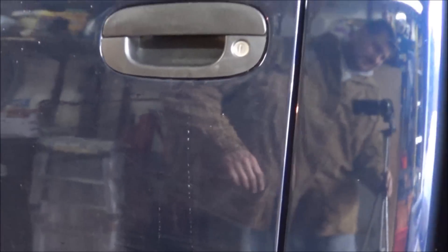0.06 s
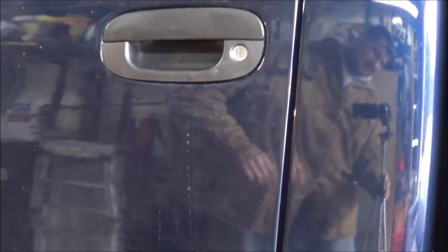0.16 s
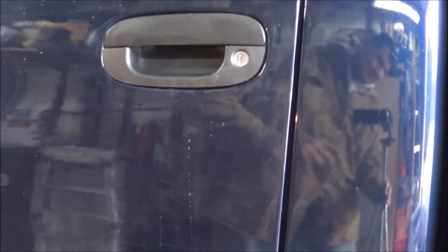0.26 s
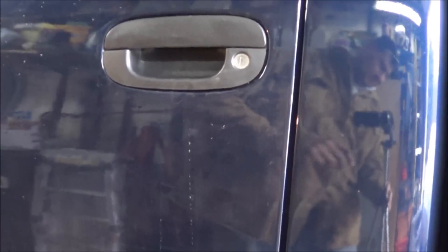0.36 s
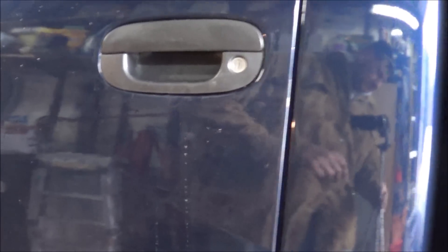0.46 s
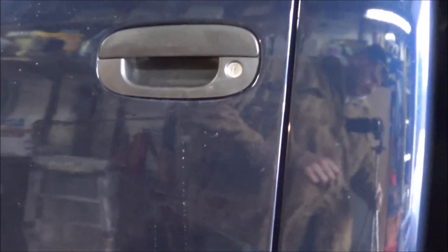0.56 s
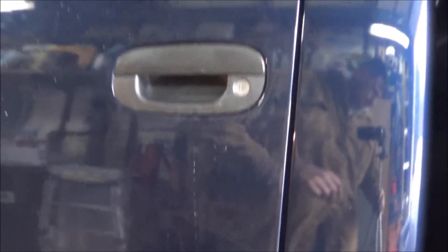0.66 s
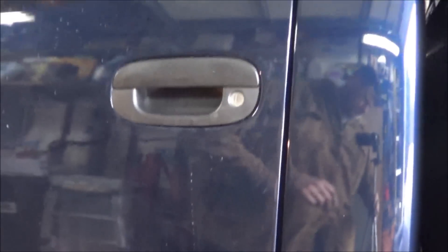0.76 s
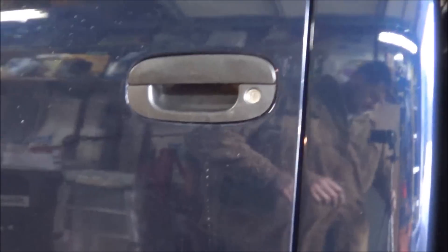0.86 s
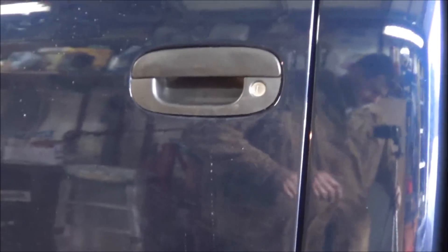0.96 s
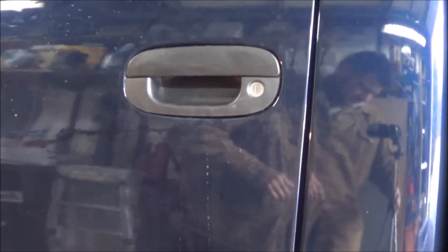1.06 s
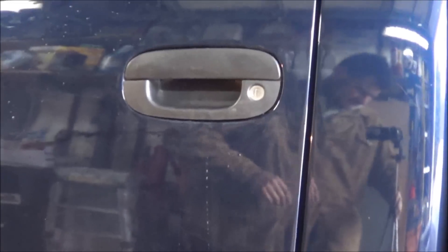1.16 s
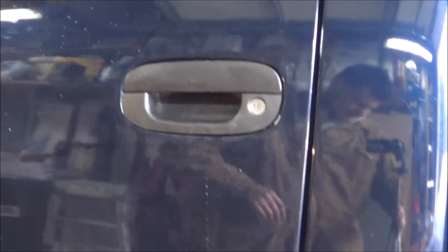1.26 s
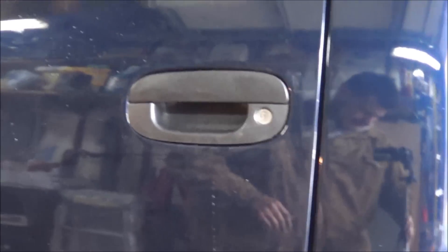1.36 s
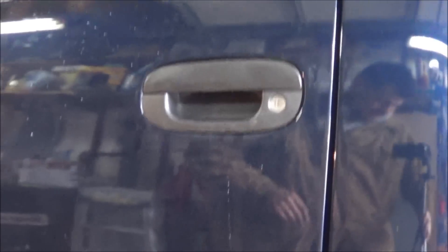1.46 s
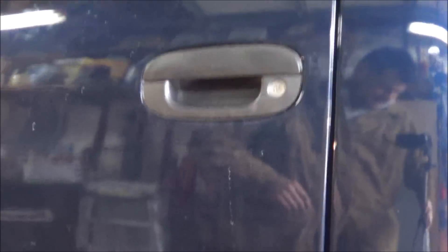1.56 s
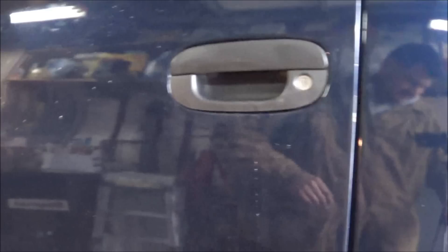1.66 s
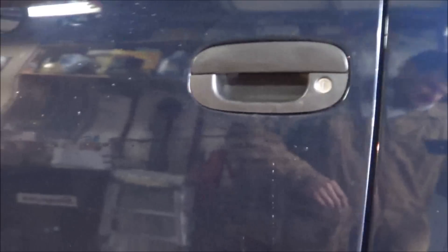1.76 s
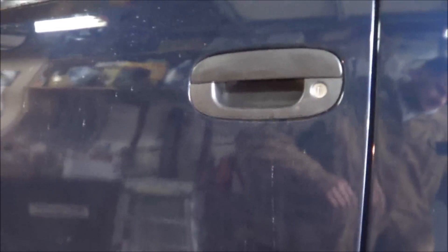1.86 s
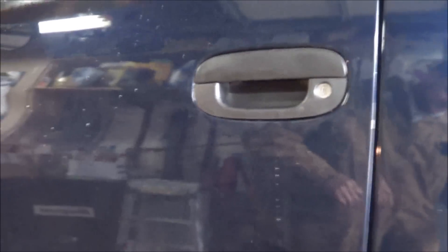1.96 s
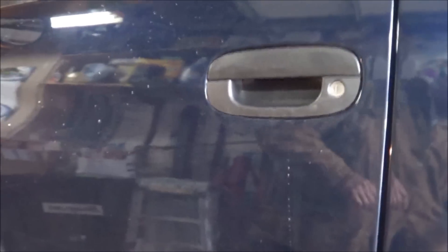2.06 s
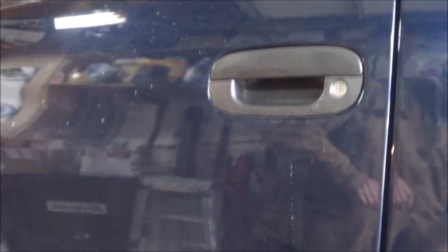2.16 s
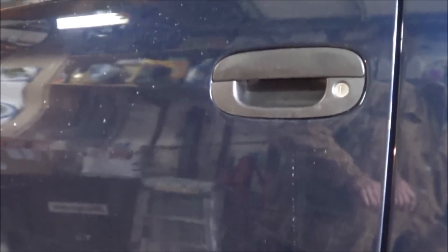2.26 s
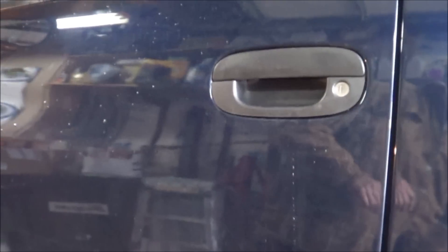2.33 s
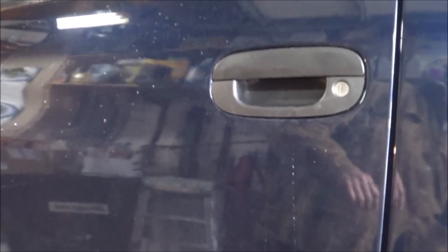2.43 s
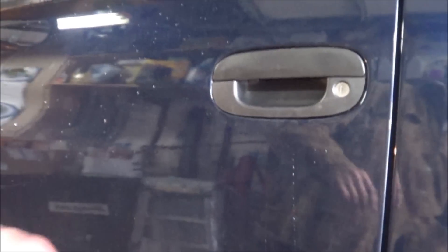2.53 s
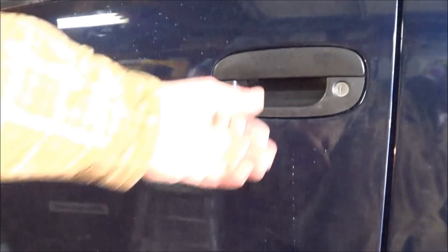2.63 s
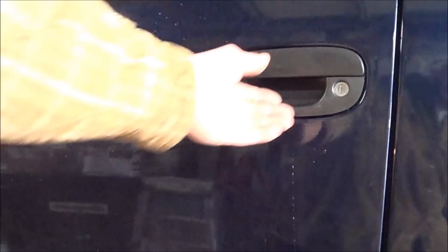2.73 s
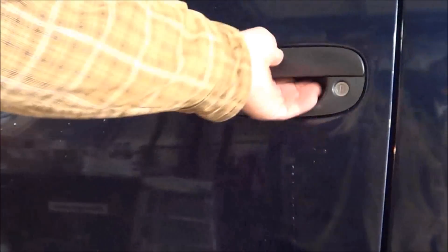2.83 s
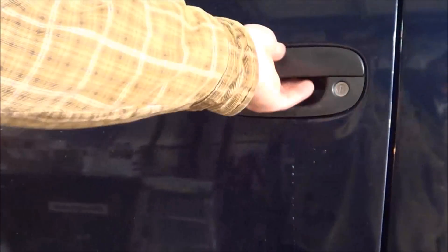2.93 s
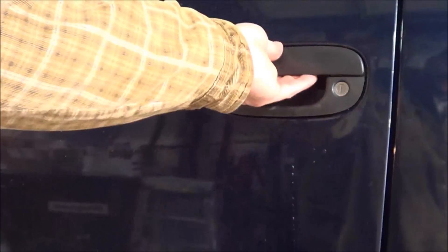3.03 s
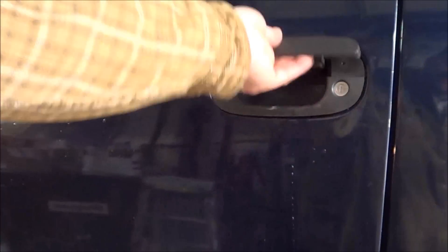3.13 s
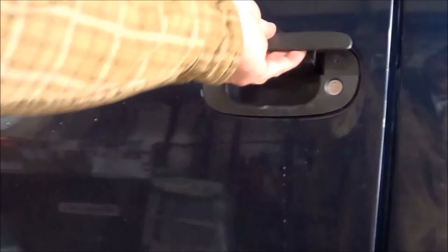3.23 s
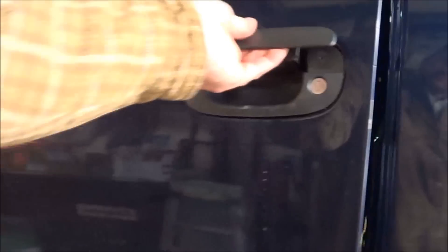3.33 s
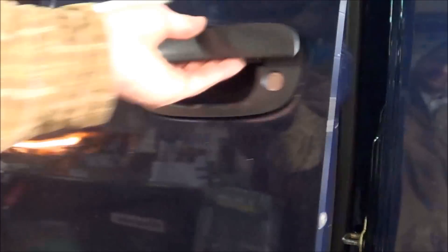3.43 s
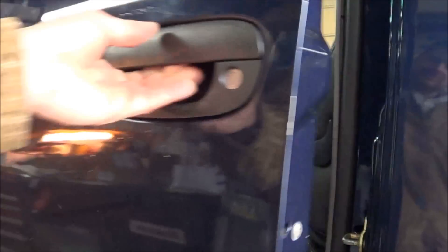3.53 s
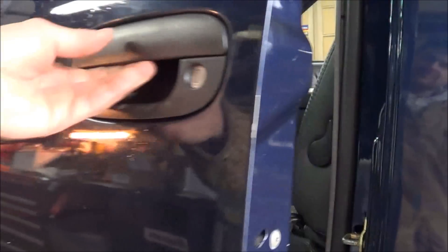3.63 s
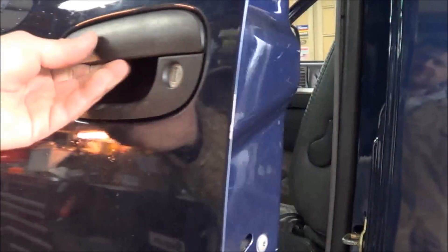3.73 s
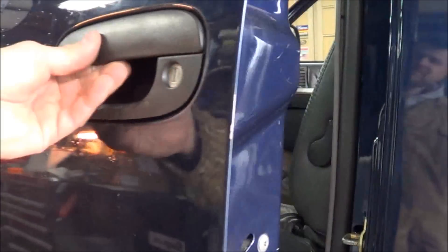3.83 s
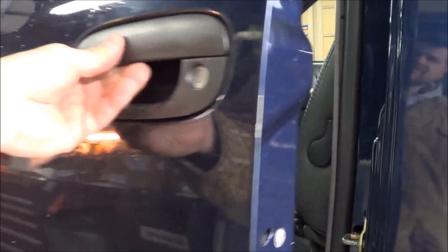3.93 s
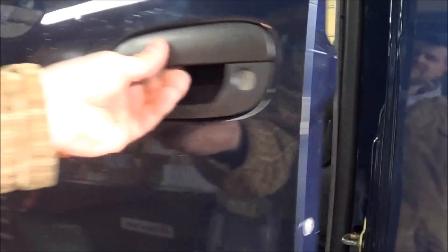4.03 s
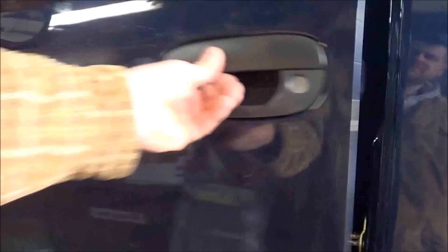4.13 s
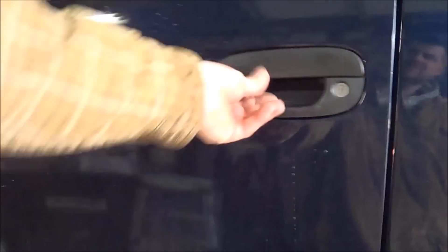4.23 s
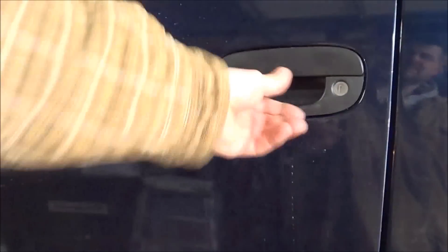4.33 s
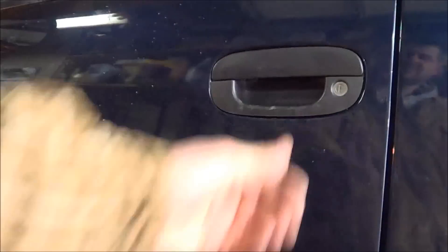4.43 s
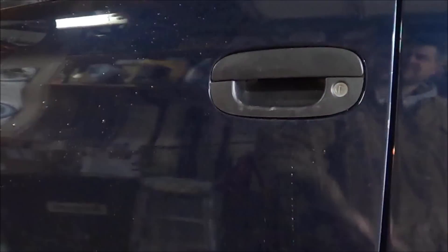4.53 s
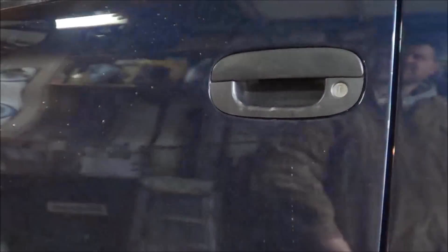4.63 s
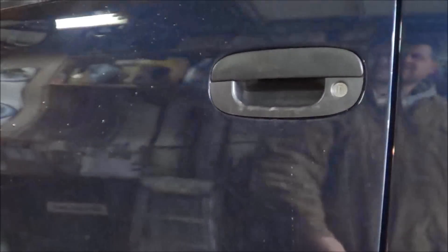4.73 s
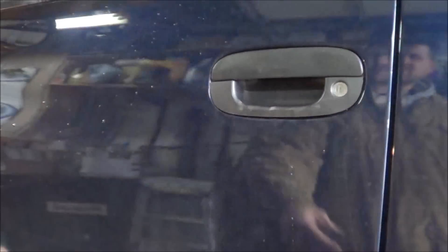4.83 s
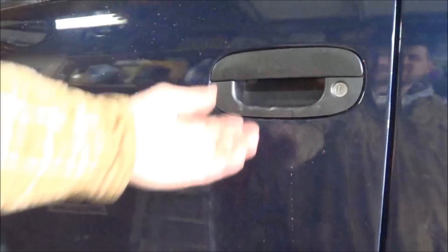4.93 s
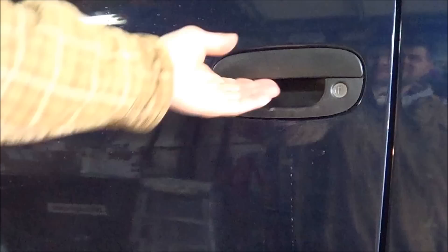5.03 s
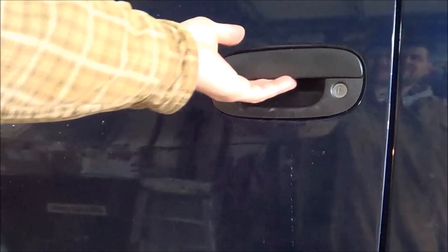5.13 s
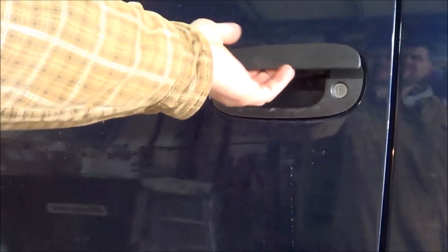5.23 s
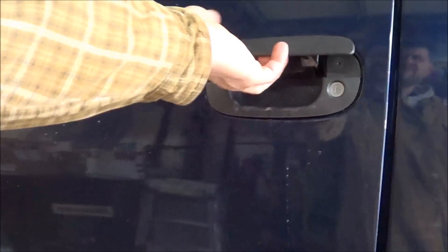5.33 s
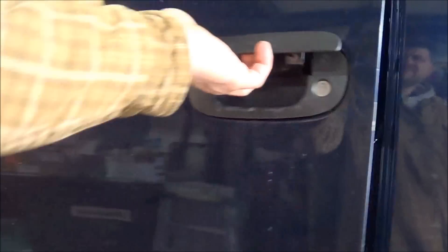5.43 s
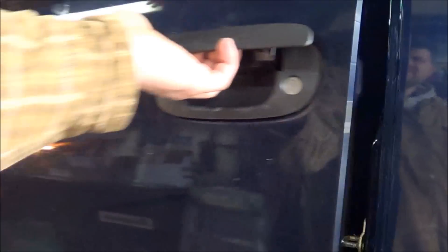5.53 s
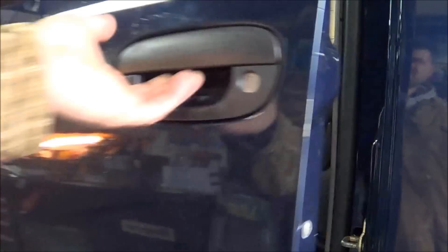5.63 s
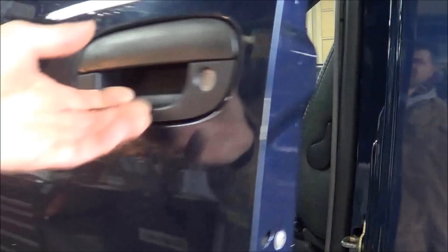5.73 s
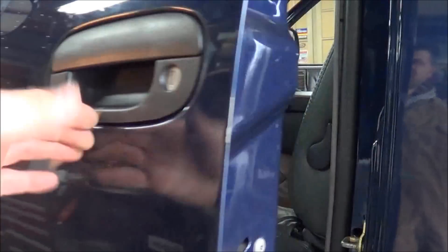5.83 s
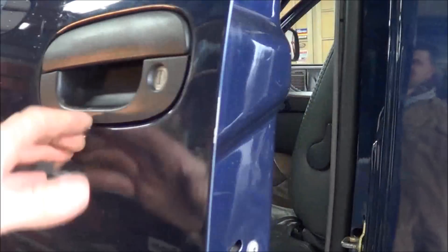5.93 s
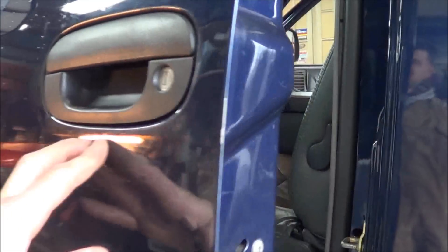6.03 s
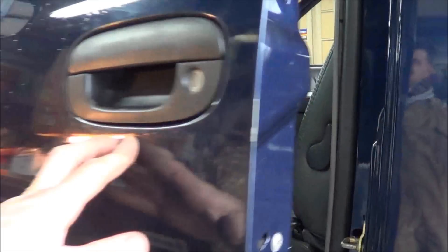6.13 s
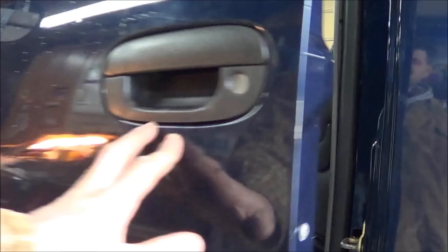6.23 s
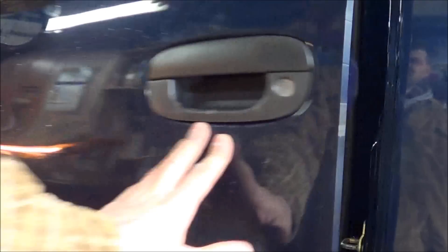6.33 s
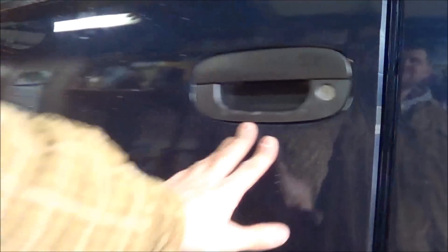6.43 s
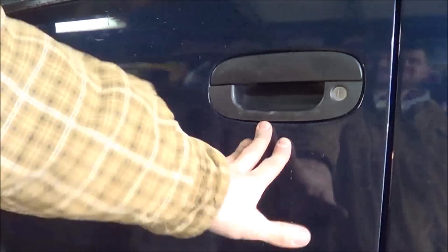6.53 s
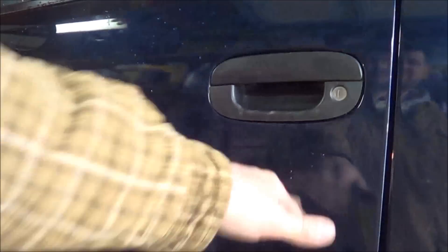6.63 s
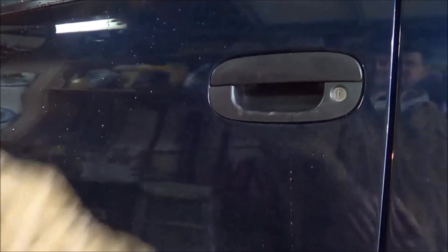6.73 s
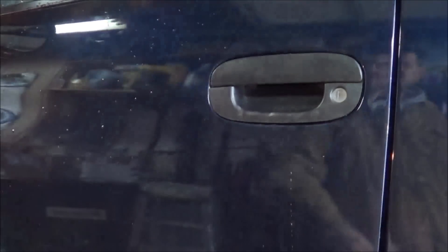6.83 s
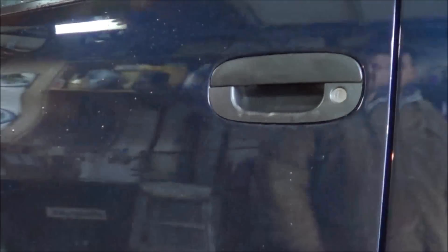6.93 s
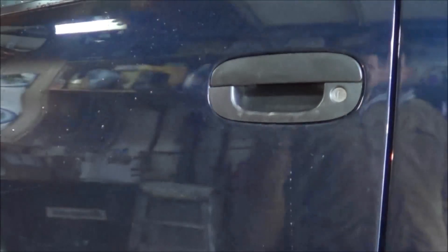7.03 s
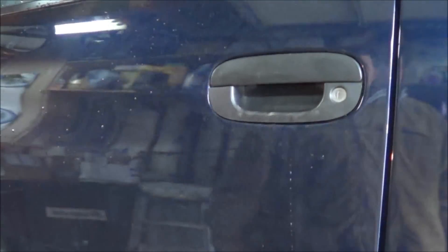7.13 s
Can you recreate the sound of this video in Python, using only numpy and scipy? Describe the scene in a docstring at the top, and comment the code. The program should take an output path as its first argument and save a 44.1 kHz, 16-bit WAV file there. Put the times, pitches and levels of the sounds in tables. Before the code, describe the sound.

Soft shuffling and small ticks over faint shop hiss and a very thin high whine. A light loose object lands and rattles to rest. Then a hollow steel vehicle door is unlatched with a sharp pop, its handle clacks back, and it is pushed shut with a deep thump and metallic clinks; all this happens twice. Outside, a vehicle approaches with growing engine hum and tyre noise. Close-up, short room echo.

```python
"""Pickup door in a garage

A door is opened and pushed shut twice: struck modes and decaying noise form its pops, booms, snaps and clinks.
Before that a light thing bounces on the floor, with irregular contacts and a dispersive springy buzz.
Filtered noise makes the sleeve and shop air; Doppler-shifted exhaust lines and noise make a vehicle droning
closer outside. A thin steady whine remains, and close-set microphones add phase differences between the sides.
"""
import sys
import numpy as np
from scipy import signal
from scipy.fft import rfft, irfft, next_fast_len
from scipy.io import wavfile

SR = 44100
rng = np.random.default_rng(int(sys.argv[2]) if len(sys.argv) > 2 else 0)


def log_audio(samples):
    """Write samples as a 16-bit WAV file to the path given in sys.argv[1]."""
    # one column per channel
    frames = np.atleast_2d(samples).T
    # limit to full scale, then quantise
    limited = np.clip(frames, -1, 1)
    pcm = np.round(limited * 32767).astype(np.int16)
    wavfile.write(sys.argv[1], SR, pcm)


N = 316638

# Every event tilt is relative to the colour or modes of its body; every spectrum level is relative.
# Door unlatching and popping off its seal: (time [s], reference level [dB])
OPENINGS = [(3.1895, -14), (5.371, -13.5)]
# Contacts set off by each opening: (delay [s], relative level [dB], treble tilt [dB/octave])
OPENING_POP = [(0, 1.5, -1.5), (.012, -1.5, 0.18)]
OPENING_SNAP = [(0.00048, -8.5, -2)]
OPENING_CLICK = [(.0048, -8.5, -1)]
# Door pushed shut: (time [s], reference level [dB])
SLAMS = [(4.3107, -13.5), (6.554, -14.5)]
# Latch riding over the striker and dropping home: (delay [s], relative level [dB], treble tilt [dB/octave])
SLAM_LATCH = [(0, -11, -4), (.016, -10, 2), (0.0233, -6, 4.5), (.039, -4, -2.5), (.058, -6, -3.5)]
# Seal, then latch, shaking the cab: (delay [s], relative level [dB], treble tilt [dB/octave])
SLAM_CAB = [(.003, -12.5, -2.5), (0.044, -0.5, 0)]
# Sprung handle let go: (time [s], level [dB], loss per bounce [dB], panel answer level [dB],
# panel answer tilt [dB/octave])
RELEASES = [(3.5502, -16, 9, -23, -1.5), (5.702, -15, 2, -17, 2.5)]
# Single snaps of handle or latch: (time [s], level [dB], treble tilt [dB/octave])
SNAPS = [(3.119, -27, -0.5), (4.251, -28.5, 1.5), (4.403, -20.5, 1.5)]
# Dry clicks of rod linkage and pawl: (time [s], level [dB], treble tilt [dB/octave])
LINKAGE_CLICKS = [(3.153, -21.5, -2.5), (3.5145, -33.5, -2), (5.286, -29.5, -2), (5.669, -29, -4.5),
                  (6.672, -33.5, 7)]
# Light knocks on the hollow door: (time [s], level [dB], treble tilt [dB/octave])
KNOCKS = [(2.803, -37, 9), (2.820, -33, -8), (3.122, -38, -12), (4.253, -25.5, 4.5), (4.282, -25, 2.5),
          (5.290, -27.5, -3.5), (6.520, -28.5, 3.5)]
# Freed door rebounding on its catch: (time [s], level [dB], treble tilt [dB/octave])
REBOUNDS = [(3.215, -24, -8), (3.264, -24.5, 0.5), (5.4391, -20.5, 1.5)]
# Steel latch clinking: (time [s], level [dB], treble tilt [dB/octave])
CLINKS = [(4.3495, -18.5, 3.5), (4.461, -29.5, -0.5), (4.502, -18.5, 1.5), (4.677, -26, 0),
          (4.745, -33.5, -3.5), (6.953, -19.5, -.5), (7.074, -25.5, -2), (7.132, -31.5, -1.5)]
# Light thing landing: (time [s], level [dB], treble tilt [dB/octave], delay of the other end's slap [s],
# slap level [dB])
BOUNCES = [(1.609, -17.5, -0.5, 0.0079, -17), (1.778, -16, -2, .013, -25.5), (1.913, -20, -2, 0.0092, -16),
           (1.997, -30, -2, .024, -29), (2.060, -26.5, -5, .006, -21), (2.114, -30, 1.5, .007, -47),
           (2.150, -26, -2.5, 0.0088, -46), (2.222, -28.5, -3, 0.019, -33.5),
           (2.2732, -24.5, -1, 0.007, -26), (2.372, -31, 0.5, 0.0057, -42)]
# Small dry ticks: (time [s], level [dB], treble tilt [dB/octave])
TICKS = [(.768, -38, 6), (.941, -30, 9.5), (1.017, -40, -5.5), (1.682, -31, -4), (1.706, -36, 7),
         (1.944, -22.5, -1.5), (2.0095, -31, 11), (2.137, -35, 6), (2.275, -26.5, 2), (2.372, -38, 2),
         (2.567, -35.5, 8), (2.831, -33, -4)]
# Soft shuffling bumps: (time [s], level [dB])
BUMPS = [(.068, -38.5), (.160, -35), (0.629, -42.5), (.785, -38), (0.844, -40.5), (1.035, -41.5),
         (1.110, -38.5)]
# Strokes of sleeve and hand: (time [s], length before release [s], level [dB])
STROKES = [(0.14, 0.34, -51.5), (0.52, 0.046, -44), (0.775, 0.076, -44), (.9, 0.16, -53),
           (2.823, 0.13, -43), (3.52, 0.091, -38.5), (3.796, 0.045, -50.5), (4.17, 0.083, -55),
           (5.093, 0.089, -44)]

# Vibration modes of each struck body: (frequency [Hz], relative level [dB], t60 [s])
HANDLE_MODES = [(1220, 9, 0.14), (1522, 1, 0.11), (1930, -3, 0.13), (2676, -3, 0.12), (2810, -37, 0.043),
                (3750, -26, 0.13)]
POP_MODES = [(103, -8.5, 0.11), (174.6, 0.5, 0.14), (217, -21, 0.21), (278, -10, 0.098), (370, -15, 0.07),
             (432, -14.5, .13), (576, -14, 0.065), (723, -12.5, 0.15)]
DOOR_MODES = [(169, 2, 0.33), (182, -13, 0.2), (230, -2, 0.21), (291, -4, 0.1), (309.4, -10.5, 0.11),
              (426.7, -9, 0.11), (462, -9, 0.077), (546, -1.5, 0.096), (674, -14.5, 0.074), (787, -11, 0.2),
              (1047, -18, 0.042)]
CATCH_MODES = [(570, -7, 0.071), (635, 8, 0.053), (719, 3, 0.075), (775, -15, 0.048), (1023, -19, 0.22)]
LATCH_MODES = [(550, -4, .08), (626, 0, 0.12), (728, -8, 0.06), (811, -1.5, 0.083), (2350, 6, 0.029),
               (2400, -6.5, .035), (2467, -4, 0.062), (2550, -8, 0.048), (3445, -12.5, 0.086)]
CAB_MODES = [(23.4, 1, 0.58), (37.8, 3, 0.54), (46.3, -11, 0.47), (82.5, -20, 0.73), (95, 13.5, 0.24),
             (155.3, 16, 0.16)]
BOUNCE_MODES = [(184, -4, 0.061), (511, -7, 0.14), (717, -4.5, 0.072), (1068, 1, 0.083), (1133, -7.5, 0.16),
                (2350, -2.5, 0.033), (3240, -4, 0.026)]
# Noise spectrum of each contact and its dense ringing: (frequency [Hz], density [dB per Hz])
HANDLE_COLOUR = [(150, 13), (500, 6.5), (1200, 1.5), (2600, -1), (3800, -4.5), (5000, -8), (9500, -4.5),
                 (12000, -7.5), (15500, -39)]
CLICK_COLOUR = [(200, -1), (900, -4.5), (1900, 1), (3700, 3.5), (6500, -2.5), (10000, -1), (15000, 3)]
DOOR_COLOUR = [(30, -49), (70, -24), (130, -7.5), (220, 2.5), (330, -4.5), (520, 2.5), (750, -10),
               (1100, -12), (2000, -24.5), (5000, -35), (15000, -42)]
CATCH_COLOUR = [(150, -19), (400, -18), (700, 3.5), (1100, -9), (2500, -24), (9000, -34.5), (15000, -31)]
LATCH_COLOUR = [(150, -1), (260, -7.5), (700, -8), (1400, -11.5), (2500, -11.5), (4500, -17.5),
                (10000, -18), (15000, -15.5)]
BOUNCE_COLOUR = [(50, -6), (150, 1.5), (600, -0.5), (1100, -2), (1600, -11), (2400, -8.5), (4800, -18),
                 (9000, -12.5), (15000, -21)]
TICK_COLOUR = [(60, -40), (400, -55), (2000, -2), (5000, -4.5), (9500, 9), (15500, -0.5)]
BUMP_COLOUR = [(50, -19.5), (150, -1), (320, -10), (600, 3.5), (1100, -3.5), (2200, -23.5), (6000, -25),
               (15000, -26)]
# Multiplier of crack and ringing times: (frequency [Hz], factor [-])
RING_T60_FACTOR = [(100, 1.04), (500, 1.54), (2000, 1.53), (8000, 1.1), (16000, 0.22)]

# Exhaust lines: (multiple of the cycle rate [-], relative level [dB])
BOOM = [(4, -2.5), (5, -11.5)]
OVERTONES = [(7, -0.5), (8, -2), (12, -10.5)]
# Course of boom and overtones before their overall gains: (time [s], relative level [dB])
BOOM_LEVEL = [(0.0, -61), (1.18, -61.5), (2.18, -48), (2.72, -59), (3.22, -46), (3.58, -51), (4.52, -39),
              (4.98, -45.5), (5.84, -27.5), (5.96, -26.5), (6.34, -22), (6.74, -33), (7.18, -35.5)]
OVERTONE_LEVEL = [(4.7, -58), (4.98, -47.5), (5.29, -35), (6.31, -38), (6.47, -32), (7.18, -37)]
# Spectra of cloth, tyres, road hiss and steady shop air: (frequency [Hz], density [dB per Hz])
CLOTH = [(200, -15), (900, 7.5), (2500, -5.5), (5000, -2), (7500, -4), (9700, 4), (11500, -2), (13000, -8),
         (15500, -20)]
TYRES = [(40, -5), (100, -8), (250, 1), (420, -23), (700, 0), (950, 1), (1400, -4), (2200, -6), (4000, -22),
         (9000, -30), (12000, -32), (15500, -50)]
ROAD_HISS = [(200, -23), (900, -1), (2500, 4), (7000, 1), (9700, 0.5), (13000, -14), (15500, -25)]
AIR = [(15, -46), (25, -10.5), (58, -15.5), (72, -14), (92, 2.5), (130, -23.5), (166, -16.5), (249, -9),
       (285, -60), (354, -16.5), (1070, -11.5), (5570, -31), (10400, -35.5), (14400, -31), (16000, -51)]
# Decay of the garage: (frequency [Hz], t60 [s])
GARAGE_T60 = [(100, 0.64), (1000, 0.17), (4000, 0.23), (10000, 0.26), (16000, 0.19)]
# Phase lead of the left side at obliqueness 1: (frequency [Hz], lead [rad])
PORT_PHASE = [(30, 0.41), (110, 0.43), (300, 0.86), (600, 0.79), (1200, 0.84), (2400, 0.35), (4800, 0.53),
              (10000, 0.027)]
# Diffuse sound before the port phase: (frequency [Hz], side minus mid [dB])
WIDTH = [(40, -55), (200, -14.5), (700, -9), (2000, -6.5), (5000, -5), (9000, -11), (15000, -59)]

# Door
RELEASE_GAP_S, RELEASE_TILT_DB, PANEL_ANSWER_S = .014, 1.5, .019  # tilt in dB per octave
SHUDDER_GAP_S, SHUDDER_LOSS_DB, SHUDDER_TILT_DB = .0195, 2, 2.5  # loss per contact, tilt per octave
# Dropped thing: the slap is brighter, then it rocks back more weakly
SLAP_TILT_DB, ROCK_S, ROCK_LOSS_DB = 3.5, .019, 9.5  # extra tilt in dB per octave
RATTLES_PER_S, RATTLE_DB, RATTLE_FADE_DB_PER_S = 30, -38, 6  # level at the first landing
BUZZ_DELAY_S, BUZZ_DB = .014, -35
BUMP_TILT_DB = 2  # per octave
# Cloth
STROKE_ATTACK_S, STROKE_RELEASE_S = .009, .046  # the release is an amplitude time constant
HANDLING_DB = -55
# Vehicle at steady speed; the distance is at its nearest
PASS_S, SPEED_M_PER_S, DISTANCE_M, CYCLES_PER_S = 6.9, 10.5, 7.4, 21.8
BOOM_DB, OVERTONES_DB = 1.5, -4
TYRES_DB, HISS_DB, FAR_TRAFFIC_DB = -33, -43, -50.5  # tyres and hiss at the nearest point
# Background
AIR_DB = -43
WHINE_HZ, WHINE_DB = 15734, -67
CUTOFF_HZ = 16100

# Noise bands and time axes
EDGES = np.geomspace(22, 17500, 24)
CENTRES = np.sqrt(EDGES[1:] * EDGES[:-1])
BANK = [signal.butter(2, pair, "band", fs=SR, output="sos") for pair in zip(EDGES, EDGES[1:])]
TIME = np.arange(N) / SR
RING_TIME = TIME[:SR // 2]


def door():
    """Impact excitation: handle, linkage and latch strike a hollow steel door, which booms and shakes the cab."""
    snaps = SNAPS + set_off(OPENINGS, OPENING_SNAP) + set_off(SLAMS, SLAM_LATCH)
    clicks = LINKAGE_CLICKS + set_off(OPENINGS, OPENING_CLICK)
    knocks, rebounds = list(KNOCKS), []
    for s, level_db, loss_db, panel_db, panel_tilt_db in RELEASES:
        knocks.append((s + PANEL_ANSWER_S, panel_db, panel_tilt_db))
        snaps += chatter(s, level_db, RELEASE_TILT_DB, RELEASE_GAP_S, loss_db, count=3)
    for s, level_db in SLAMS:
        knocks += chatter(s, level_db, SHUDDER_TILT_DB, SHUDDER_GAP_S, SHUDDER_LOSS_DB, count=6)
    for s, level_db, tilt_db in REBOUNDS:
        rebounds += chatter(s, level_db, tilt_db, gap_s=.018, loss_db=3.5, count=2)

    handle = blows(snaps, HANDLE_COLOUR, HANDLE_MODES, modes_db=-10.5, crack_t60=.015,
                   ring_t60=.13, ring_db=4.5, rise_s=.00013, ring_growth=.17)
    linkage = blows(clicks, CLICK_COLOUR, None, modes_db=0, crack_t60=.016,
                    ring_t60=.11, ring_db=-24, rise_s=.002, ring_growth=0)
    pop = blows(set_off(OPENINGS, OPENING_POP), DOOR_COLOUR, POP_MODES, modes_db=3, crack_t60=.049,
                ring_t60=.18, ring_db=4, rise_s=.00052, ring_growth=0)
    panel = blows(knocks, DOOR_COLOUR, DOOR_MODES, modes_db=-1.5, crack_t60=.11,
                  ring_t60=.1, ring_db=1, rise_s=.00098, ring_growth=0)
    catch = blows(rebounds, CATCH_COLOUR, CATCH_MODES, modes_db=3.5, crack_t60=.024,
                  ring_t60=.045, ring_db=-9, rise_s=.00048, ring_growth=0)
    latch = blows(CLINKS, LATCH_COLOUR, LATCH_MODES, modes_db=4.5, crack_t60=.039,
                  ring_t60=.13, ring_db=1.5, rise_s=.0019, ring_growth=0)
    return small_radiator(handle + linkage + pop + panel + catch + latch) + cab()


def cab():
    """Modal resonance: each slam excites the low modes of the cab."""
    out = np.zeros(N)
    for s, level_db, tilt_db in set_off(SLAMS, SLAM_CAB):
        add(out, from_db(level_db) * modes_struck(CAB_MODES, tilt_db, scatter_db=1), s)
    return out


def set_off(events, stages):
    """Causal sequence: every event starts the same run of delayed contacts."""
    contacts = []
    for s, level_db in events:
        for delay_s, relative_db, tilt_db in stages:
            contacts.append((s + delay_s, level_db + relative_db, tilt_db))
    return contacts


def chatter(s, level_db, tilt_db, gap_s, loss_db, count):
    """Inelastic rebound: a contact repeats at even gaps, each time weaker by a fixed number of decibels."""
    return [(s + k * gap_s, level_db - k * loss_db, tilt_db) for k in range(count)]


def blows(events, colour, modes, modes_db, crack_t60, ring_t60, ring_db, rise_s, ring_growth):
    """Superposition: a contact is a crack, dense ringing and, where given, clear modes."""
    out, size = np.zeros(N), len(RING_TIME)
    # Both given ring times [s] are scaled in each band
    factor = at_hz(RING_T60_FACTOR, CENTRES)
    crack, ring = fade(crack_t60 * factor), fade(ring_t60 * factor)
    contact = 1 - np.exp(-RING_TIME / rise_s)
    grain = noise_bands(4 * size)
    hardest_db = max(event[1] for event in events)
    for s, level_db, tilt_db in events:
        start = rng.integers(3 * size)
        gain = from_db(at_hz(colour, CENTRES) + tilt_db * np.log2(CENTRES))
        # Positive growth [dB per dB] gives harder blows a larger share of ringing
        ring_gain = from_db(ring_db + ring_growth * (level_db - hardest_db))
        envelope = crack + ring_gain * ring
        sound = attack_one(gain @ (envelope * grain[:, start:start + size]))
        if modes:
            sound = sound + from_db(modes_db) * modes_struck(modes, tilt_db, scatter_db=3)
        add(out, from_db(level_db) * attack_one(contact * sound), s)
    return out


def modes_struck(modes, tilt_db, scatter_db):
    """Modal participation: each blow lands elsewhere, so every mode gets its own strength and sign."""
    hz, db, t60 = np.transpose(modes)
    scatter = scatter_db * rng.standard_normal(len(hz))
    gain = from_db(db + tilt_db * np.log2(hz / 1000) + scatter) * rng.choice([-1, 1], len(hz))
    ringing = fade(t60) * np.sin(2 * np.pi * hz[:, None] * RING_TIME)
    return attack_one(gain @ ringing)


def small_radiator(x, corner_hz=75):
    """Radiation efficiency: a panel much smaller than the wavelength radiates little deep bass."""
    highpass = signal.butter(2, corner_hz, "high", fs=SR, output="sos")
    return signal.sosfilt(highpass, x + 1e-18)  # the tiny offset leaves no exact silence


def dropped_thing():
    """Repeated impact: irregular bounces, slaps and rattles ring a light thing, with a springy buzz."""
    hits = blows(floor_contacts(), BOUNCE_COLOUR, BOUNCE_MODES, modes_db=-2, crack_t60=.022,
                 ring_t60=.12, ring_db=-7, rise_s=.00066, ring_growth=.0095)
    return spring_buzz() + hits


def floor_contacts():
    """Two-point contact: one end lands, the other slaps, the thing rocks back; loose parts rattle at random."""
    contacts = []
    for s, level_db, tilt_db, slap_s, slap_db in BOUNCES:
        contacts.append((s, level_db, tilt_db))
        contacts += chatter(s + slap_s, slap_db, tilt_db + SLAP_TILT_DB, ROCK_S, ROCK_LOSS_DB, count=2)
    first, last = BOUNCES[0][0], BOUNCES[-1][0]
    for s in np.arange(first, last, 1 / RATTLES_PER_S):
        level_db = RATTLE_DB - RATTLE_FADE_DB_PER_S * (s - first) + 2 * rng.standard_normal()
        contacts.append((s + rng.random() / RATTLES_PER_S, level_db, 0))
    return contacts


def spring_buzz(trip_s=.012, top_hz=4300, bottom_hz=3200, loss_db=5.5, rough=.2):
    """Dispersion: high notes travel faster in a spring, so each return is a ragged falling chirp."""
    t = TIME[:round(trip_s * SR)]
    window = np.hanning(len(t)) ** 2
    rasp = signal.butter(2, [1200, 7000], "band", fs=SR, output="sos")
    out = np.zeros(N)
    for s, *_ in BOUNCES:
        for trip, (detune, phase) in enumerate(rng.standard_normal(size=(6, 2))):
            start_hz = top_hz * (1 + .037 * detune)
            chirp = signal.chirp(t, start_hz, trip_s, bottom_hz, phi=np.degrees(phase))
            grit = rough * rms_one(signal.sosfilt(rasp, rng.standard_normal(len(t))))
            pulse = from_db(BUZZ_DB - loss_db * trip) * window * (chirp + grit)
            add(out, pulse, s + BUZZ_DELAY_S + trip * trip_s)
    return out


def ticks():
    """Contact duration: tiny hard contacts rise abruptly, soft shuffling bumps rise slowly."""
    hard = blows(TICKS, TICK_COLOUR, None, modes_db=0, crack_t60=.0033,
                 ring_t60=.044, ring_db=-18, rise_s=.00012, ring_growth=0)
    bumps = [(s, level_db, BUMP_TILT_DB) for s, level_db in BUMPS]
    soft = blows(bumps, BUMP_COLOUR, None, modes_db=0, crack_t60=.028,
                 ring_t60=.28, ring_db=-6.5, rise_s=.0053, ring_growth=0)
    return hard + soft


def sleeve():
    """Friction noise: strokes of cloth swell, hold and die away, adding in power to a faint rustle."""
    # The rustle fades over the last second before the first opening
    power = from_db(HANDLING_DB) ** 2 * np.clip(OPENINGS[0][0] - TIME, 0, 1)
    for s, length_s, level_db in STROKES:
        attack = np.clip((TIME - s) / STROKE_ATTACK_S, 0, 1)
        release = np.exp(-np.clip((TIME - s - length_s) / STROKE_RELEASE_S, 0, 20))
        power = power + (from_db(level_db) * attack * release) ** 2
    return np.sqrt(power) * wash(CLOTH)


def vehicle(tyre_falloff=1.04, hiss_falloff=2.8):
    """Doppler effect and spreading: exhaust pitch sinks in passing; hiss falls faster with distance than tyres."""
    along = SPEED_M_PER_S * (TIME - PASS_S)
    distance = np.hypot(along, DISTANCE_M)
    near = DISTANCE_M / distance
    phase = 2 * np.pi * CYCLES_PER_S * (TIME - distance / 343)  # delayed at 343 m/s
    boom_gain = from_db(BOOM_DB + in_time(BOOM_LEVEL)[0])
    boom = boom_gain * exhaust(BOOM, phase, waver_db=2.5)
    overtone_gain = from_db(OVERTONES_DB + in_time(OVERTONE_LEVEL)[0])
    overtones = overtone_gain * exhaust(OVERTONES, phase, waver_db=2.5)
    # Steady far traffic adds in power to the tyres
    tyre_gain = np.hypot(from_db(TYRES_DB) * near ** tyre_falloff, from_db(FAR_TRAFFIC_DB))
    hiss_gain = from_db(HISS_DB) * near ** hiss_falloff
    return boom + overtones + tyre_gain * wash(TYRES) + hiss_gain * wash(ROAD_HISS)


def exhaust(lines, phase, waver_db):
    """Harmonic excitation: engine orders are multiples of the cycle rate, their levels wavering at random."""
    knots = np.arange(0, TIME[-1] + 1, .25)
    out = 0
    for multiple, level_db in lines:
        waver = waver_db * np.interp(TIME, knots, rng.standard_normal(len(knots)))
        out = out + from_db(level_db + waver) * np.sin(multiple * phase + rng.uniform(0, 2 * np.pi))
    return np.sqrt(2) * out


def shop_air():
    """Stationary noise: the quiet shop hiss has a fixed spectrum and level."""
    return from_db(AIR_DB) * wash(AIR)


def electronic_whine():
    """Pure tone: a thin electronic whine is a steady high sine."""
    return np.sqrt(2) * from_db(WHINE_DB) * np.sin(2 * np.pi * WHINE_HZ * TIME)


def garage(x, first_wall_s=.01):
    """Reverberation: a short diffuse tail builds up once the nearest surfaces answer."""
    buildup = 1 - np.exp(-(RING_TIME / first_wall_s) ** 2)
    envelope = fade(at_hz(GARAGE_T60, CENTRES)) * buildup
    tail = diffuse(lambda: envelope * noise_bands(len(RING_TIME)))
    response = rms_one(tail) / np.sqrt(len(RING_TIME))
    return signal.fftconvolve(x[None], response, axes=1)[:, :N]


def ports(x, left_db, obliqueness):
    """Interaural-type phase: close-set microphones turn direction into a phase lead and opposite side gains."""
    size = next_fast_len(N + SR // 10)
    lead = obliqueness * at_hz(PORT_PHASE, np.arange(size // 2 + 1) * SR / size)
    sides = np.array([[1], [-1]])
    shifted = irfft(rfft(x, size) * np.exp(.5j * lead * sides), size)[:, :N]
    return shifted * from_db(left_db * sides)


def diffuse(make):
    """Partial coherence: two unrelated draws form a left and right that merge in deep bass and top treble."""
    mid, side = make().sum(0), from_db(at_hz(WIDTH, CENTRES)) @ make()
    return np.array([mid + side, mid - side])


def wash(colour):
    """Spectral shaping: weighted noise bands give diffuse stereo noise of unit rms."""
    return rms_one(diffuse(lambda: from_db(at_hz(colour, CENTRES))[:, None] * noise_bands(N)))


def noise_bands(size):
    """Filter-bank analysis: one row of noise per band, neighbours drawn from unrelated noise."""
    white = rng.standard_normal((2, size + SR // 4))
    return np.array([signal.sosfilt(sos, white[k % 2])[-size:] for k, sos in enumerate(BANK)])


def fade(t60):
    """Exponential decay: level falls 60 dB in each ring time, which is at least 2 ms."""
    return from_db(-60 * RING_TIME / np.maximum(t60, .002)[:, None])


def from_db(db):
    """Logarithmic level: decibels to amplitude gain."""
    return 10 ** (np.asarray(db) / 20)


def rms_one(x):
    """Mean-square level: scale to unit rms."""
    return x / np.sqrt(np.mean(x ** 2) + 1e-20)


def attack_one(x):
    """Onset level: scale a blow to unit rms over its first hundredth of a second."""
    return x / np.sqrt(np.mean(x[:SR // 100] ** 2) + 1e-20)


def in_time(rows):
    """Linear interpolation: columns of a curve at every sample."""
    s, *columns = np.transpose(rows)
    return [np.interp(TIME, s, c) for c in columns]


def at_hz(points, hz):
    """Logarithmic frequency: interpolate a spectrum along octaves."""
    f, value = np.transpose(points)
    return np.interp(np.log(np.maximum(hz, 1)), np.log(f), value)


def add(out, sound, s):
    """Linear superposition: mix a sound in from time s on."""
    start = round(s * SR)
    out[start:start + len(sound)] += sound[:N - start]


def scene():
    """Superposition of fields: near sounds and their room join air, cloth, traffic and whine."""
    truck, floor_hits = door(), small_radiator(dropped_thing())
    room = garage(from_db(-9.5) * truck + from_db(-11.5) * floor_hits)
    near = ports(truck + ticks() + room + sleeve(), left_db=-.1, obliqueness=1.18)
    far = ports(floor_hits + shop_air(), left_db=-1.1, obliqueness=.8)
    outside = ports(vehicle(), left_db=-.65, obliqueness=.91)
    return near + far + outside + electronic_whine()


def record(dry):
    """Saturation and band limiting: peaks are rounded and the top is cut."""
    top = .8
    rounded = top * np.tanh(dry / top)
    lowpass = signal.ellip(10, .2, 80, CUTOFF_HZ, fs=SR, output="sos")
    return signal.sosfilt(lowpass, rounded)


dry = scene()
out = record(dry)
log_audio(out)
```